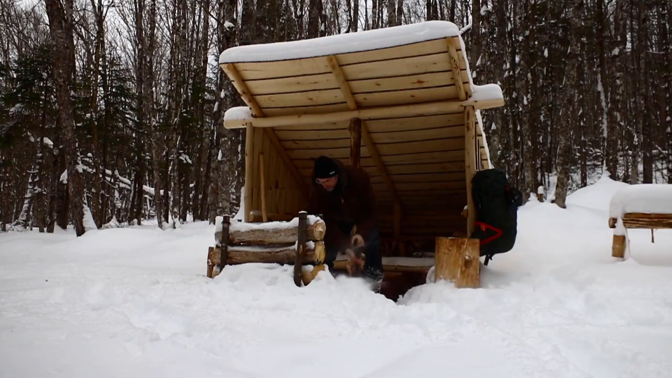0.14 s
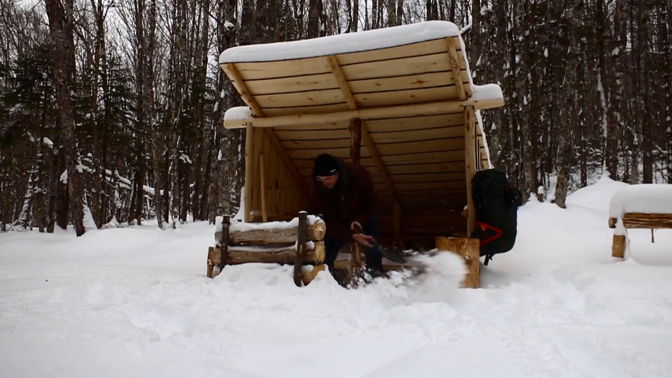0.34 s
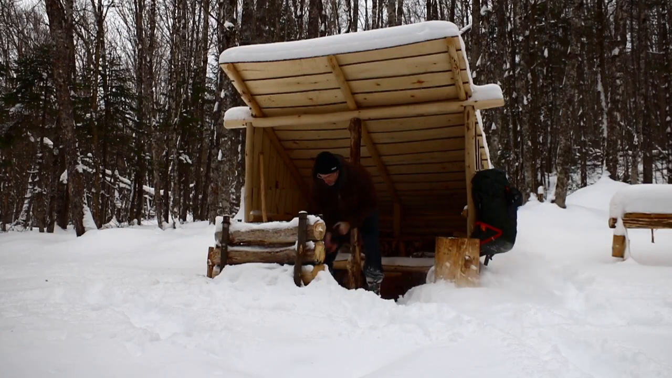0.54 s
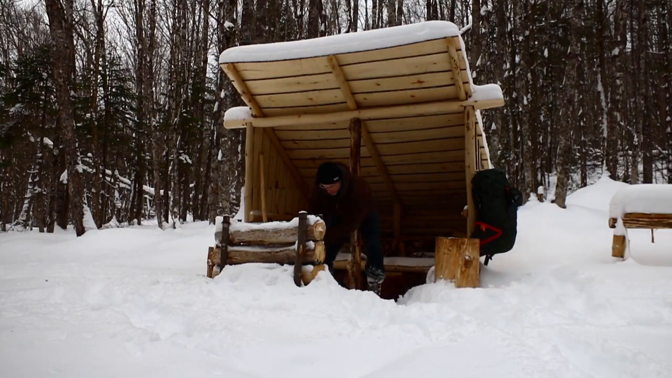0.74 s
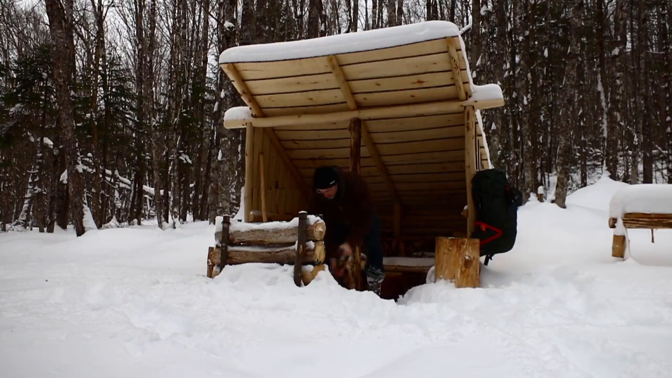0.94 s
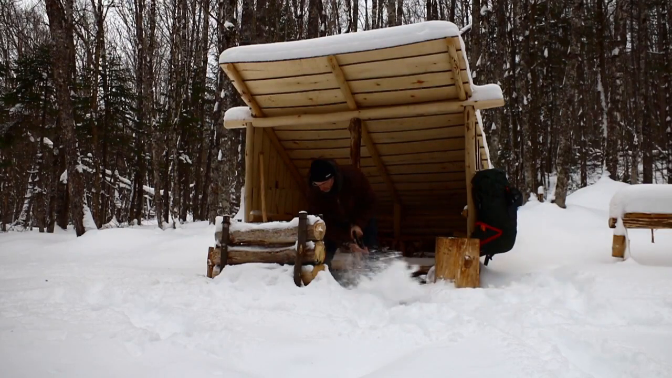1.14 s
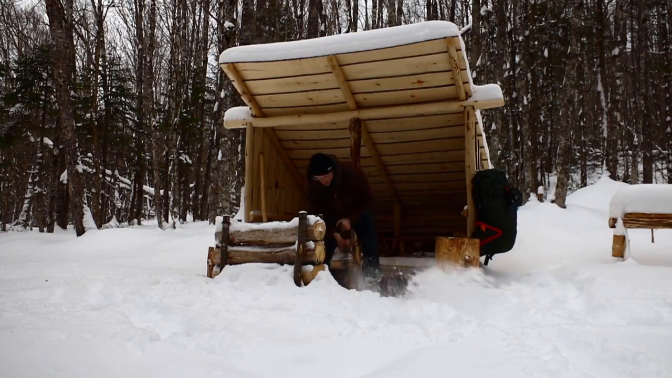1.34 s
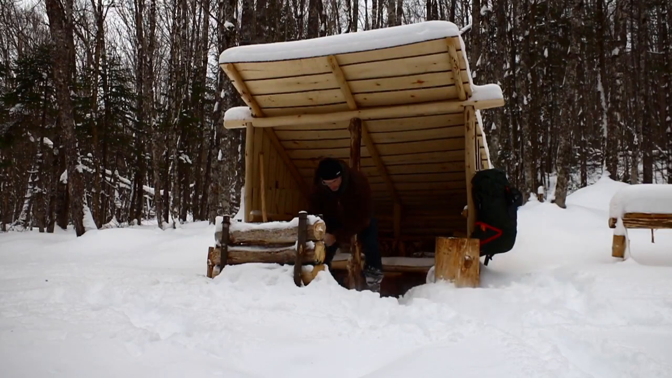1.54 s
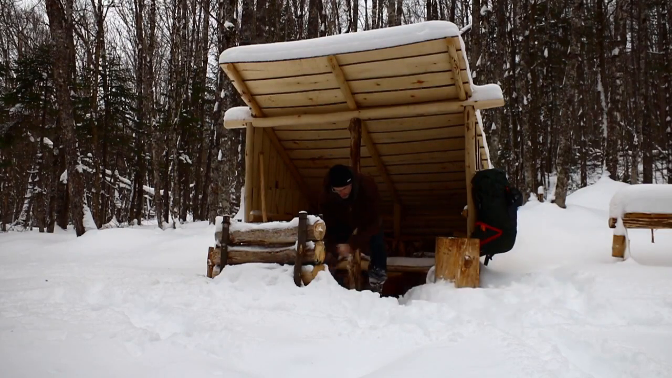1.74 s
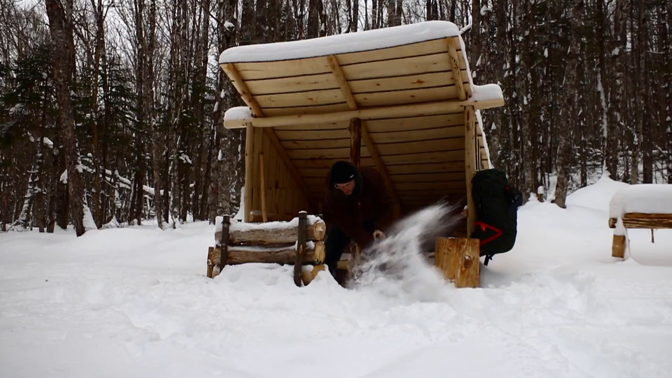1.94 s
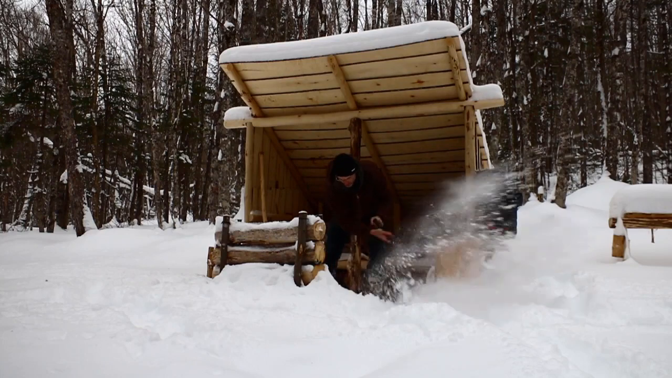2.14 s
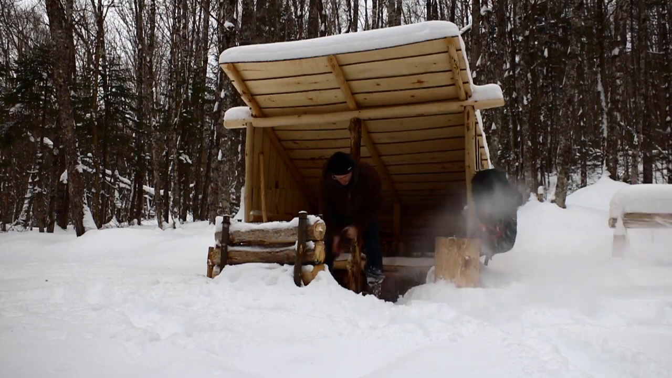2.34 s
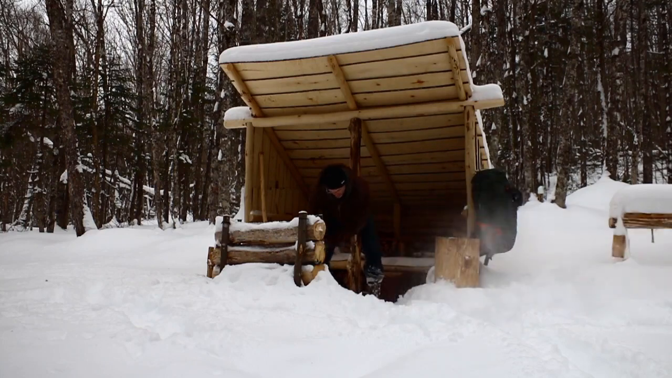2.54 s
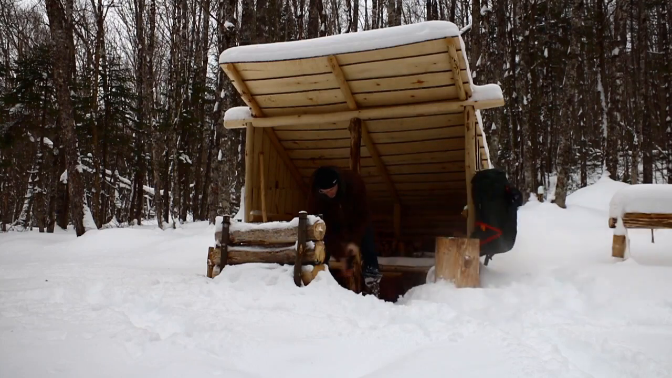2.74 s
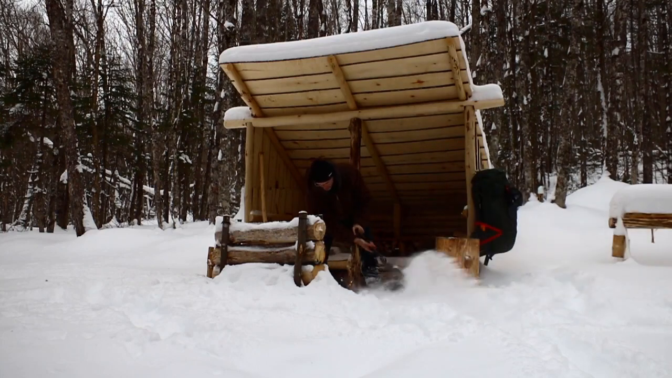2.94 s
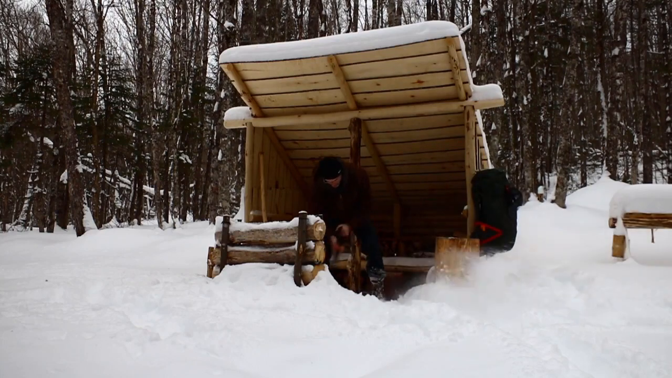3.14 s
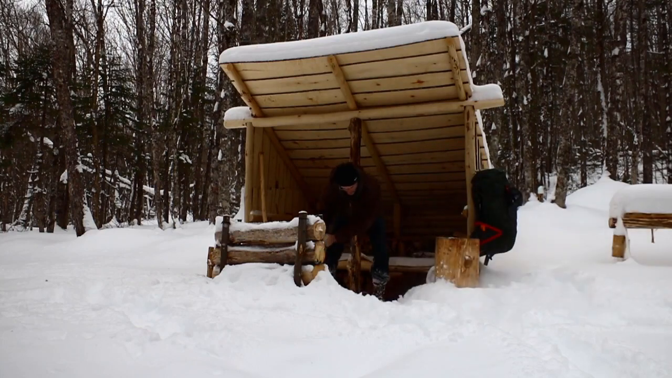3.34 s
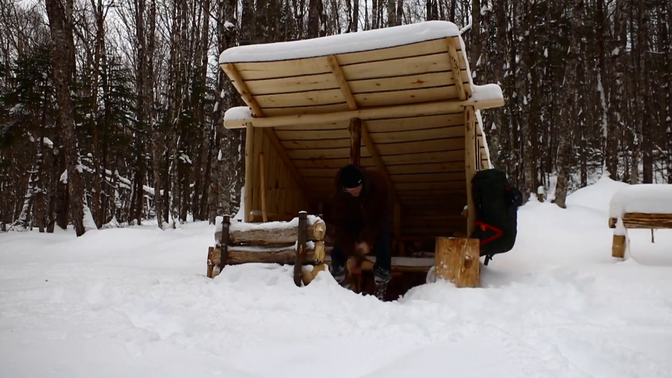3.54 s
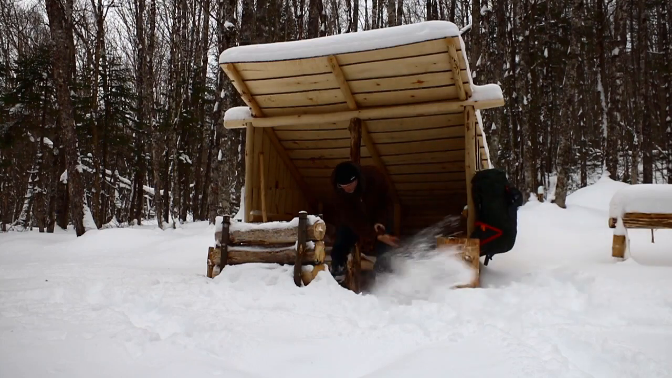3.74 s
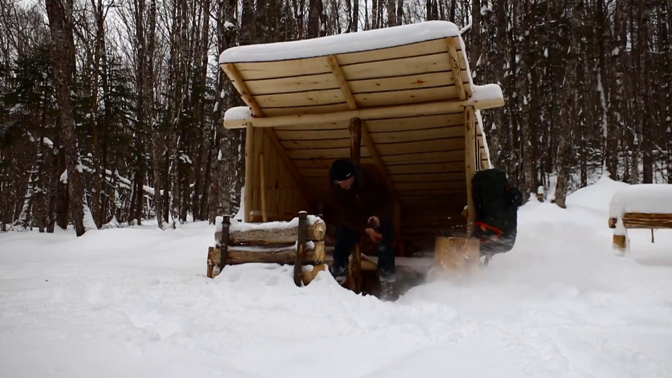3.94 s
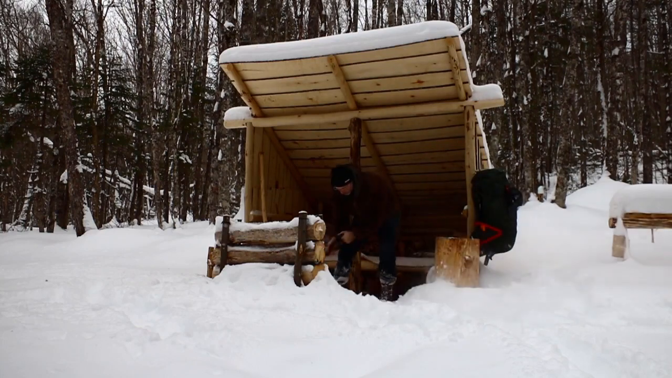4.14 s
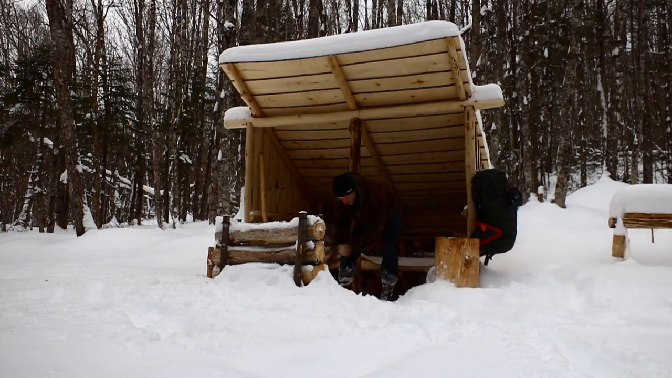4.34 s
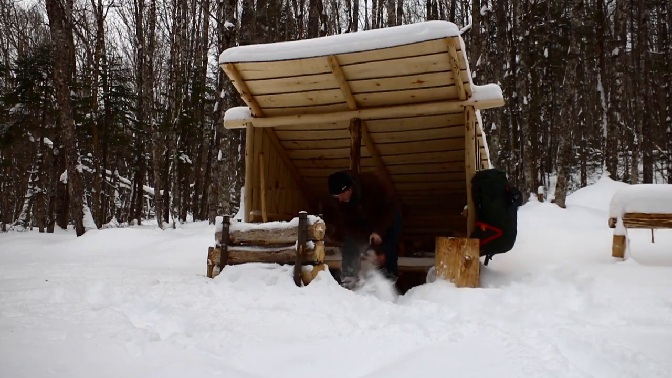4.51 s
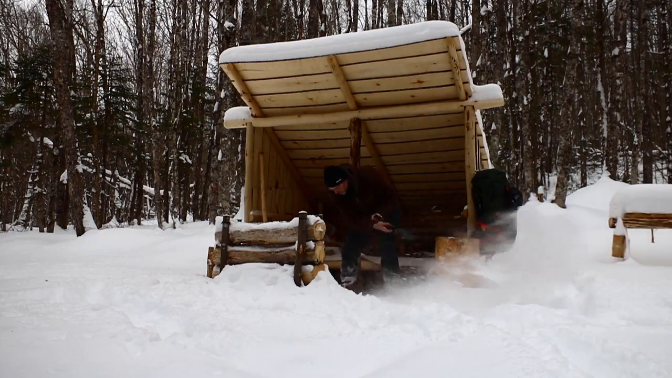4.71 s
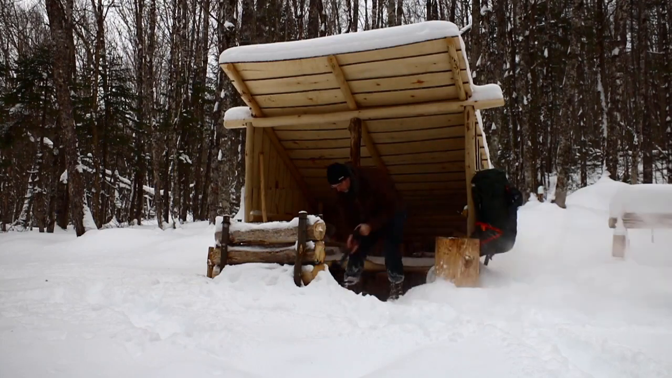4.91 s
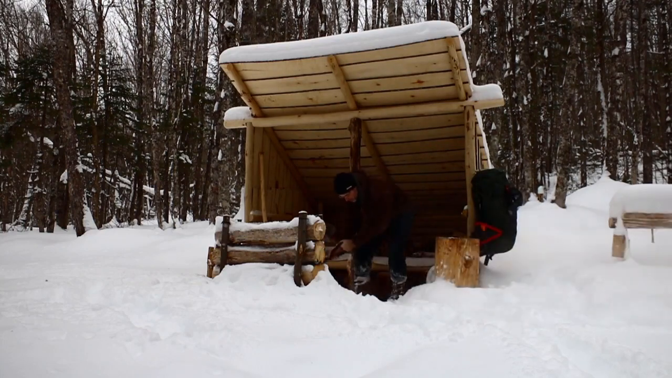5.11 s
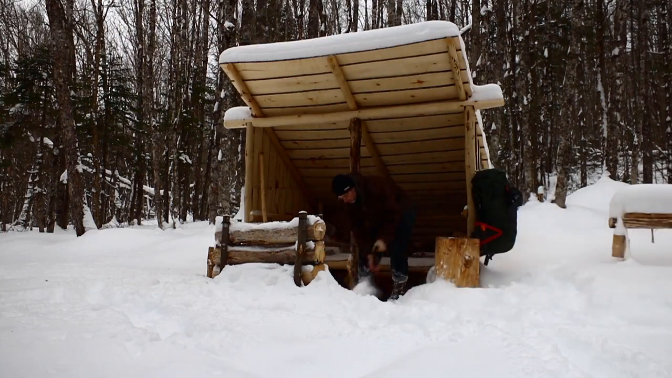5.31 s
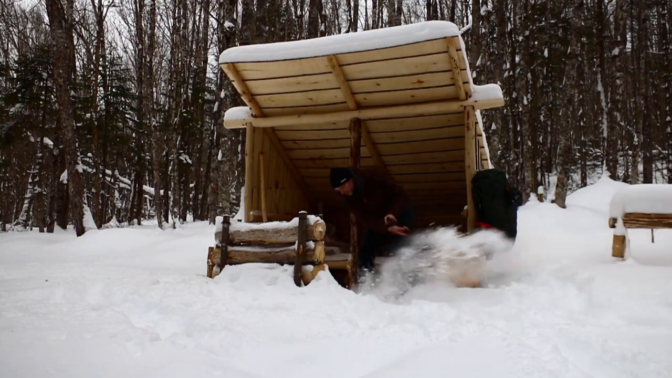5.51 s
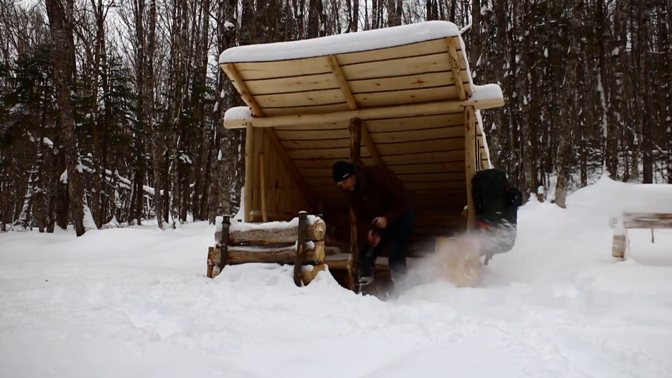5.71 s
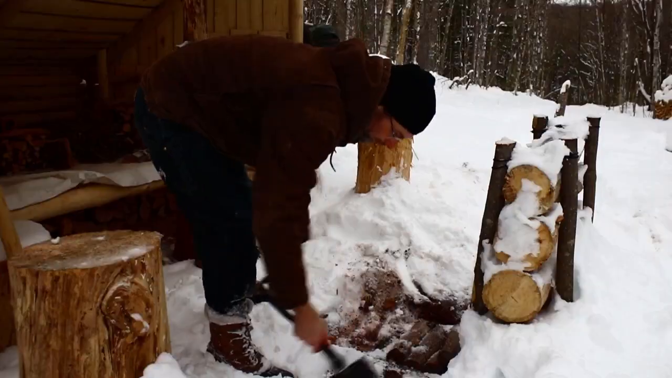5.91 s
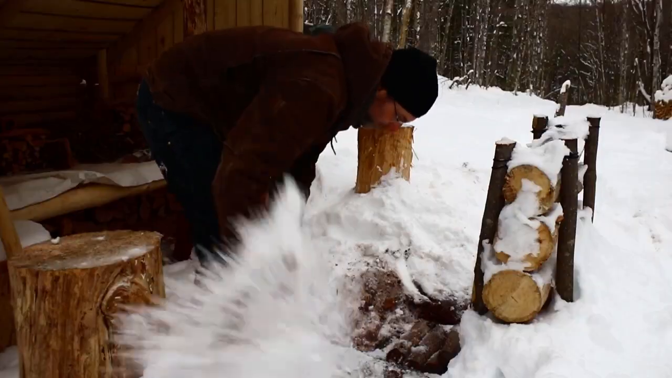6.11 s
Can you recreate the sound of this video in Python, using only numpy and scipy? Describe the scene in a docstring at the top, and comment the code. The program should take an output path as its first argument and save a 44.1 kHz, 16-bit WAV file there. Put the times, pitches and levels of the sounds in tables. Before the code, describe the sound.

Heard from some metres away, a shovel blade catches, crunches and scrapes through crusty snow, with small icy ticks and brief pauses between strokes. Faint short echoes return from boards and trunks. A few blows carry a soft low thump, strongest after five seconds. At the end, close up, one sharp, heavy metallic crunch and scrape stands far above everything before.

```python
"""In front of an open log shelter in a quiet wood, a small metal shovel chops and scrapes packed snow.
Random showers of breaking crystals are filtered into crunch, fizz and the ringing modes of the blade.
Hard blows excite low, heavily damped modes of the pack; sparse echoes return from walls and trunks.
A far murmur and recorder hiss, both filtered noise, lie under it.
Near the end the microphone stands much closer."""
import sys
import numpy as np
from scipy import signal
from scipy.io import wavfile
from scipy.ndimage import uniform_filter1d

SR = 44100
rng = np.random.default_rng(int(sys.argv[2]) if len(sys.argv) > 2 else 0)


def store_pcm(level_fs):
    """Save levels as 16-bit WAV."""
    pcm = np.round(np.clip(level_fs, -1, 1) * 32767).astype(np.int16)
    wavfile.write(sys.argv[1], SR, np.atleast_2d(pcm).T)


N = 271803  # length [samples]

# modes of the blade, damped by snow: (frequency [Hz], relative level [dB], nominal decay time T60 [s])
BLADE = [(582, -22, 0.17), (863, -1.5, 0.15), (964, -1.5, 0.026), (1010, 9.5, 0.055), (1240, -29, 0.096),
         (1658.5, 15, 0.037), (1733, -1.5, 0.12), (1865, -10, 0.11), (1993, 11, 0.063), (2270, 16.5, 0.018),
         (2719, 14.5, 0.022), (2910, -23.5, 0.017), (3530, 5, 0.025), (3650, -3, 0.058), (4300, -26, 0.052),
         (4770, 2, 0.11), (5580, 0, 0.076), (7320, -2, 0.078), (7630, -10, .07), (7600, -12, 0.036),
         (7900, 7.5, 0.078)]
# spectrum of the fizz of fine crystals: (frequency [Hz], relative level per Hz [dB])
FIZZ = [(2200, -19.5), (3300, -4.5), (4500, -3), (6200, -7.5), (7700, 2), (8600, -3.5), (10000, -11),
        (13000, -4.5), (16000, -30)]


def gain_of(db):
    """Level to amplitude: 20 dB is a factor of ten."""
    return 10 ** (np.asarray(db) / 20)


def evened(x):
    """Normalization of a signal to unit RMS."""
    return x / np.sqrt(np.mean(x ** 2, axis=-1, keepdims=True) + 1e-30)


def add(mix, s, sound):
    """Superposition: the sound is summed into the mix from time s [s]."""
    part = mix[..., round(s * SR):][..., :sound.shape[-1]]
    part += sound[..., :part.shape[-1]]


def taps_of(points):
    """Minimum-phase filter of unit energy: the Hilbert transform of the log gain gives the phase."""
    hz, db = np.transpose(points)
    grid = abs(np.fft.fftfreq(8192, 1 / SR))
    log_gain = np.interp(np.log(grid + 1), np.log(hz), db) * np.log(10) / 20
    spectrum = np.exp(np.conj(signal.hilbert(log_gain)))
    taps = np.fft.ifft(spectrum).real[:4096]
    return taps / np.linalg.norm(taps)


def coloured(x, points):
    """Spectral shaping by convolution, one channel a row."""
    return signal.oaconvolve(x, taps_of(points)[None], axes=1)[:, :N]


def crystals(size, per_s, spread_db):
    """Random impulse process: crystals snap at independent moments, a few of them strongly."""
    chance, sign, rank = rng.random((3, size))
    strength = gain_of(spread_db * np.minimum(-np.log(rank + 1e-9), 4))
    return evened(strength * np.sign(sign - .5) * (chance < per_s / SR))


def grain(hz, cycles):
    """Heavily damped oscillation: a few cycles with a soft start under an envelope of peak 1."""
    u = np.arange(round(3 * cycles / hz * SR) + 8) / SR * hz / cycles * 4  # the envelope peaks at u = 1
    return u * np.exp(1 - u) * np.sin(np.pi / 2 * u * cycles)


def ringing(hz, db, t60):
    """Modal impulse response: exponentially decaying modes, one a column, unit energy together."""
    t = np.arange(6000)[:, None] / SR
    taps = gain_of(db - 60 * t / t60) * np.sin(2 * np.pi * hz * t)
    return taps / np.linalg.norm(taps)


def murmur():
    """Coherent filtered noise: a far low murmur, nearly alike in both channels, swells slightly."""
    # spectrum of the murmur: (frequency [Hz], relative level per Hz [dB])
    murmur_spectrum = [(20, -36), (50, -12.5), (120, -7), (210, -2.5), (310, -1.5), (450, -4), (900, -12),
                       (2000, -22), (5000, -30)]
    # level about which the murmur swells: (time [s], level [dB])
    murmur_level = [(0, -64), (5.8, -66), (5.83, -62), (6.17, -58.5)]
    t = np.arange(N) / SR
    swell = evened(sum(np.sin(2 * np.pi * (f * t + rng.random())) / np.sqrt(f)
                       for f in np.geomspace(.5, 12, 20)))
    common, left, right = rng.standard_normal((3, N))
    sound = evened(coloured(common + gain_of(-22.0) * np.array([left, right]), murmur_spectrum))
    return sound * gain_of(np.interp(t, *np.transpose(murmur_level)) + .7 * swell)


def grit(points, count, per_s, cycles, clumpy_db):
    """Granular fracture: each crystal size has its pitch and breaks in clumps of its own."""
    hz, db = np.transpose(points)
    together = evened(uniform_filter1d(rng.standard_normal(N), size=120))
    out = np.zeros(N)
    for pitch in np.geomspace(hz[0], hz[-1], count):
        apart = evened(uniform_filter1d(rng.standard_normal(N // 64 + 1), size=6)).repeat(64)[:N]
        clumps = gain_of(clumpy_db * np.minimum(apart, 1.8) + 0.28 * together)
        snaps = crystals(N, per_s, 0.79) * clumps
        snap = grain(pitch, cycles)
        # equal pitch ratios widen the bands with pitch, hence the square root
        share = gain_of(np.interp(np.log(pitch), np.log(hz), db)) * np.sqrt(pitch)
        out += share * signal.oaconvolve(snaps, snap / np.linalg.norm(snap))[:N]
    return evened(out)


def chatter(drive, wander_db):
    """Modal coupling: the contact wanders along the edge, so each mode comes and goes by itself."""
    out = np.zeros(N)
    for taps in ringing(*np.transpose(BLADE)).T:
        wander = evened(uniform_filter1d(rng.standard_normal(N // 256 + 1), size=8)).repeat(256)[:N]
        knocks = drive * gain_of(wander_db * wander) * crystals(N, 600, 4.2)
        out += signal.oaconvolve(knocks, taps)[:N]
    return out


def slides():
    """Friction: under the moving edge snow breaks in uneven clumps and keeps the blade ringing a little."""
    # the blade sliding under load: (start [s], length [s], relative pressure at start [dB], at end [dB],
    # fizz against pressure [dB], blade ring against pressure [dB]), all before the mix below
    strokes = [(0.091, 0.075, -50.5, -59.5, 2.5, 10.5), (0.185, .03, -46, -65, -6, -12),
               (0.302, .018, -66, -62, -1, -6), (0.328, .055, -44, -66, -10.5, -10),
               (0.675, .07, -64, -69, -6, -10), (0.98, 0.041, -38, -60, 0.5, -6),
               (1.022, 0.1, -54.5, -50.5, -1.5, 7), (1.211, 0.053, -72, -47, -16, 1),
               (1.569, .012, -66, -59, -4, -12), (1.585, 0.07, -47.5, -67, -12, -8),
               (1.847, 0.01, -66, -50, -19, 6), (1.861, 0.04, -44, -48, 1, -5),
               (1.964, 0.07, -65, -55.5, -4, -2), (2.048, .03, -42, -67, -14, 1.5),
               (2.13, 0.056, -65, -69, -1, -3), (2.775, 0.069, -32.5, -66, -2, 5),
               (2.823, 0.096, -51, -54.5, -3, 5.5), (2.938, 0.063, -60, -59, -11, 3),
               (2.986, .035, -45, -65, -13, 6), (3.02, 0.15, -67, -62, -2.5, 3),
               (3.34, .04, -55.5, -58.5, -11, 4), (3.601, 0.05, -39, -56, -6, -4),
               (3.641, 0.06, -56, -50.5, -6.5, 5), (3.797, 0.24, -61.5, -78.5, 2.5, 7.5),
               (4.491, 0.04, -41.5, -53, -7, -7), (4.532, 0.072, -47.5, -72, -2.5, 6),
               (4.622, .03, -45, -61, -20, -1), (4.652, 0.13, -68, -67.5, -2.5, 5),
               (5.08, 0.054, -69, -73, 2, 0), (5.332, .026, -59, -35, -10.5, -4),
               (5.394, .085, -63, -56.5, -3, -6), (5.478, 0.033, -49, -59, -9, -10),
               (5.52, 0.11, -49, -71.5, -1.5, -5), (5.824, 0.11, -68.5, -71.5, 4, 5),
               (5.963, 0.056, -29, -38, -5, 0), (6.021, 0.023, -38, -28, -6.5, -26),
               (6.076, .085, -43.5, -67, -3, -13)]
    # spectrum of snow crushing: (frequency [Hz], relative level per Hz [dB])
    crunch_spectrum = [(300, -27), (600, -2), (1000, -15.5), (1600, 2.5), (2500, -8), (3400, -1),
                       (5000, -9)]
    catch_db_per_s, let_go_db_per_s = 5000, 598  # rise of pressure before a slide, fall after it
    power = np.zeros((3, N))
    for s, length, start_db, end_db, fizz_db, ring_db in strokes:
        t = np.arange(-.02, length + .1, 1 / SR)
        pressure_db = np.interp(t, [0, length], [start_db, end_db])
        pressure_db = pressure_db + catch_db_per_s * np.minimum(t, 0)
        pressure_db = pressure_db - let_go_db_per_s * np.maximum(t - length, 0)
        levels_db = pressure_db + np.array([[0], [fizz_db], [ring_db]])
        add(power, s + t[0], gain_of(levels_db) ** 2)
    pressure, fizz, ring = np.sqrt(power)
    crunch = pressure * grit(crunch_spectrum, count=14, per_s=500, cycles=4.2, clumpy_db=7.0)
    bright = fizz * grit(FIZZ, count=16, per_s=1500, cycles=7.5, clumpy_db=6.5)
    rung = chatter(ring, wander_db=4.0)
    return gain_of(-9) * crunch + gain_of(-3.5) * bright + gain_of(-16.5) * rung


def burst(db, fizz_db, hz, ring_db, t60, rise, freedom, cycles, thin_db):
    """Impulsive excitation: a dying shower of snaps crunches, rings the blade's modes and fizzes."""
    t = np.arange(SR // 4) / SR
    shape = (1 - np.exp(-t / max(rise, 1e-4))) ** 2 * gain_of(-60 * t / max(t60, 4e-3))
    shape *= gain_of(db) / shape.max()
    coarse = shape * crystals(len(t), 7000, 0.94)
    fine = shape * crystals(len(t), 11000, 2.2)
    # the blow sets the energy, however the random snaps fall
    coarse, fine = (x * np.linalg.norm(shape) / np.linalg.norm(x) for x in (coarse, fine))
    snap = grain(hz, cycles)
    crunch = signal.fftconvolve(coarse, snap / np.linalg.norm(snap))[:len(t)]
    mode_hz, mode_db, mode_t60 = np.transpose(BLADE)
    mode_db = mode_db - 12 * abs(np.log2(mode_hz / hz))  # the spot that is hit favours modes near one pitch
    rung = signal.fftconvolve(coarse, ringing(mode_hz, mode_db, freedom * mode_t60).sum(1))[:len(t)]
    # thin_db per octave is taken from the lower fizz
    colour = [(f, level + thin_db * min(np.log2(f / 7700), 0)) for f, level in FIZZ]
    fizz = signal.fftconvolve(fine, taps_of(colour))[:len(t)]
    return gain_of(-18.5) * (crunch + gain_of(ring_db) * rung) + gain_of(fizz_db - 5) * fizz


def blows():
    """Brittle fracture: bites crush a layer of snow, ticks are single clods and ice snapping."""
    # the blade biting into the pack: (time [s], relative crunch level [dB], fizz against crunch [dB],
    # crunch pitch [Hz], blade ring against crunch [dB], shower T60 [s]), levels before the mix in burst
    bites = [(0.0949, -40.5, 2.5, 2050, -1, 0.093), (0.1438, -40.5, -10, 2520, 1, 0.1),
             (0.18, -39.5, -9, 1970, -1.5, 0.067), (0.3433, -43, -24, 1650, 6, 0.056),
             (0.6864, -43, -26, 2840, -2.5, 0.08), (0.9626, -22, -10, 2730, -10, 0.14),
             (0.9756, -27, -23, 2580, -2.5, 0.19), (1.058, -34, -11.5, 2300, -10, 0.12),
             (1.1202, -42, -11.5, 2530, 0, 0.28), (1.5862, -46, -20, 1330, -14, 0.22),
             (1.8619, -38.5, -9, 1720, 4, 0.22), (1.8814, -38.5, -6, 2530, 9.5, 0.14),
             (2.772, -33.5, 1.5, 1900, 10.5, 0.073), (2.7917, -40, -16, 1660, 0, 0.12),
             (2.9853, -52, -15, 2100, -7, 0.11), (3.093, -50, -7, 4000, -5, 0.12),
             (3.121, -52, -4, 2600, -7, 0.14), (3.3514, -45.5, -20, 1730, 1, 0.19),
             (3.5971, -44.5, 1.5, 1890, 1, 0.14), (3.679, -44, -4.5, 2830, 2.5, 0.13),
             (3.8354, -47, -3, 2160, -3, 0.094), (4.4845, -37.5, -8, 3300, -3, 0.14),
             (4.5306, -41, -17, 2100, -4, 0.22), (4.585, -45.5, -6, 2560, 2.5, 0.086),
             (5.3406, -36.5, -9, 2090, -2, 0.087), (5.3509, -30.5, -19, 1520, 7.5, 0.096),
             (5.414, -49.5, -1.5, 2500, -6, 0.08), (5.443, -48.5, -4, 1770, -1, 0.092),
             (5.564, -40, -20, 3700, -15, 0.051), (5.9676, -12, -16.5, 1630, 7.5, 0.03),
             (5.9732, -8, -27, 2380, -2, 0.061), (6.0194, -36, 4.5, 2320, -8, 0.11),
             (6.0349, -23, -18, 1910, -1, 0.091)]
    # single lumps giving way: (time [s], relative crunch level [dB], fizz against crunch [dB],
    # crunch pitch [Hz]), levels likewise
    ticks = [(0.3164, -53, -11, 2020), (0.3283, -47, 3, 1900), (0.3302, -38.5, -27, 1670),
             (1.2211, -48, -11, 2930), (1.2373, -45, -6.5, 4150), (1.26, -40, -11, 1590),
             (1.972, -45, -9, 1500), (2.009, -39, -34, 1350), (2.0242, -42, -1.5, 1640),
             (2.0479, -35.5, -31, 1750), (2.1344, -46, -13, 3380), (2.872, -47, -19, 1750),
             (3.61, -41, -7, 1730), (3.7669, -44, 1, 1590), (3.8033, -43.5, -23, 2280),
             (4.6207, -35, -3.5, 3250), (4.6323, -32, -15, 1510), (4.74, -51, -17, 4400),
             (4.765, -60.5, 3, 912), (5.0844, -36.5, -12.5, 4970), (5.4798, -30, -23, 2100),
             (5.522, -26.5, -34, 2750), (5.5358, -27.5, -14.5, 4070), (6.075, -40.5, -4, 2810)]
    tick_ring_db, tick_t60_s = -3, 0.015  # ring against crunch; decay of the shower
    out = np.zeros(N)
    # rise [s]; freedom: factor on the decay times of the blade's modes
    for s, *bite in bites:
        add(out, s - .001, burst(*bite, rise=0.00059, freedom=0.75, cycles=1.12, thin_db=3.0))
    for s, *tick in ticks:
        sound = burst(*tick, tick_ring_db, tick_t60_s, rise=0.00021, freedom=0.3, cycles=2.9, thin_db=6.0)
        add(out, s, gain_of(4.5) * sound)
    return out


def rings():
    """Free modal decay: after a knock one mode swells fast, shakes with the grit, and snow grips it."""
    # one mode sounding clear: (time [s], level before shaking [dB], pitch near the mode [Hz],
    # time until snow grips the blade [s])
    clear_modes = [(0.328, -62.5, 1730, .06), (0.344, -59, 2720, .045), (0.967, -32, 2262, .036),
                   (0.964, -45, 1300, 0.033), (0.971, -37, 2880, .025), (.98, -46, 1900, .025),
                   (1.259, -62, 1730, 0.021), (1.603, -62, 1730, 0.023), (1.862, -42.5, 1730, 0.0067),
                   (2.047, -58, 1730, 0.066), (2.05, -62, 3900, .02), (2.049, -60, 2720, .015),
                   (2.771, -29, 1650, 0.0079), (2.774, -39, 2720, 0.013), (2.793, -40, 1650, 0.013),
                   (2.879, -63, 1730, 0.053), (2.99, -68, 1730, .11), (3.352, -67, 1730, 0.041),
                   (4.535, -52, 1730, 0.018), (5.084, -68.5, 1730, .04), (5.31, -60.5, 1730, 0.024),
                   (5.352, -40.5, 1650, 0.054), (5.445, -62, 1730, 0.015), (5.967, -23, 1650, 0.027),
                   (5.972, -17, 2262, 0.014), (5.969, -23.5, 2720, 0.02), (5.984, -41, 5560, 0.04),
                   (6.016, -40, 7700, 0.021), (6.036, -39.5, 1860, 0.023)]
    ring_freedom = 3.1  # factor on the mode's decay time while free
    grip_t60_s = .032  # T60 of the further decay that the grip adds
    out, t = np.zeros(N), np.arange(SR // 4) / SR
    for s, db, near_hz, free_s in clear_modes:
        hz, _, t60 = min(BLADE, key=lambda mode: abs(np.log(mode[0] / near_hz)))
        shake = evened(uniform_filter1d(rng.standard_normal(len(t)), size=200))
        fade_db = 60 * t / (ring_freedom * t60) + 60 * np.maximum(t - free_s, 0) / grip_t60_s
        tone = np.sin(2 * np.pi * (hz * t + rng.random()) + 0.16 * shake)
        swelling = 1 - np.exp(-t / 0.00072)
        add(out, s, gain_of(db - fade_db + 2.9 * shake) * swelling * tone)
    return out


def thuds():
    """Damped resonance: the pack answers hard blows with low cycles, most in the modes near one pitch."""
    # hard blows that reach the pack: (time [s], relative level [dB], favoured pitch [Hz],
    # relative level of the lowest mode [dB]), to which the levels of the modes are added
    hits = [(.965, -55, 467, -65), (1.1, -53.5, 420, -72), (1.122, -51.5, 795, -75),
            (1.26, -52.5, 790, -72), (1.866, -65, 385, -63.5), (2.773, -50, 303, -71),
            (2.987, -55, 760, -68), (3.6, -54, 280, -62.5), (4.485, -47, 133, -56.5),
            (5.353, -40, 375, -55.5), (5.357, -43, 820, -75), (5.368, -42, 370, -75),
            (5.966, -28.5, 340, -44), (5.97, -25.5, 660, -55), (6.04, -42.5, 570, -58)]
    # modes of the snow pack: (frequency [Hz], relative level [dB], length [cycles])
    pack = [(87.5, 3.5, 2.1), (136, -2, 1.8), (193, 1.5, 2.4), (345, 4, 4.3), (389, -1, 4),
            (543, -7.5, 17.7), (803, 3, 5.2)]
    fall_db_per_octave = 11  # away from the favoured pitch
    low_hz, low_mode_db, low_cycles = pack[0]
    out = np.zeros(N)
    for s, db, near_hz, low_db in hits:
        add(out, s, gain_of(low_db + low_mode_db) * grain(low_hz, low_cycles))
        for k, (hz, mode_db, cycles) in enumerate(pack[1:]):
            share_db = mode_db - fall_db_per_octave * abs(np.log2(hz / near_hz))
            add(out, s, (-1) ** k * gain_of(db + share_db) * grain(hz, cycles))
    return out


def shelter(x):
    """Sparse reverberation: walls and trunks return scattered echoes that die away exponentially."""
    t = np.arange(SR // 4) / SR
    taps = np.zeros(len(t))
    at = np.arange(0, len(t) - 20, 20)
    taps[at + rng.integers(0, 20, len(at))] = rng.choice([-1., 1.], len(at))
    taps *= gain_of(-60 * t / 0.2) * (t > .004)  # T60 0.2 s, first echo after 4 ms
    return signal.oaconvolve(x, taps / np.linalg.norm(taps))[:N]


def scene():
    """Superposition of direct sound, echoes and murmur; the far shovel is coloured by distance."""
    # colour of the shovel at a distance: (frequency [Hz], relative level [dB])
    far = [(20, -1.5), (8000, 0.5), (10000, -2), (12500, -3), (16000, 4)]
    close_s = 5.82  # from here on the microphone stands close
    small_grains = signal.butter(2, 260, "high", fs=SR, output="sos")  # small grains make no bass
    snow = signal.sosfilt(small_grains, blows() + slides())
    shovel = snow + thuds() + rings()
    shovel = np.where(np.arange(N) < close_s * SR, coloured(shovel[None], far)[0], shovel)
    return shovel + gain_of(-13.5) * shelter(shovel) + murmur()


def record(dry):
    """Incoherent noise and band limiting: each channel adds its own hiss, then a low-pass acts."""
    # spectrum of the recorder hiss: (frequency [Hz], relative level per Hz [dB])
    hiss_spectrum = [(20, 8.5), (60, 8), (200, 5), (1000, -1.5), (3000, -2.5), (8000, -4), (13000, -4),
                     (15500, -3)]
    hiss_db, edge_hz = -67, 15850  # hiss level before the band limit; edge of the band
    hiss = gain_of(hiss_db) * coloured(rng.standard_normal((2, N)), hiss_spectrum)
    low_pass = signal.firwin(511, edge_hz, window=("kaiser", 9), fs=SR)
    return signal.oaconvolve(dry + hiss, low_pass[None], "same")


dry = scene()
out = record(dry)
store_pcm(out)
```